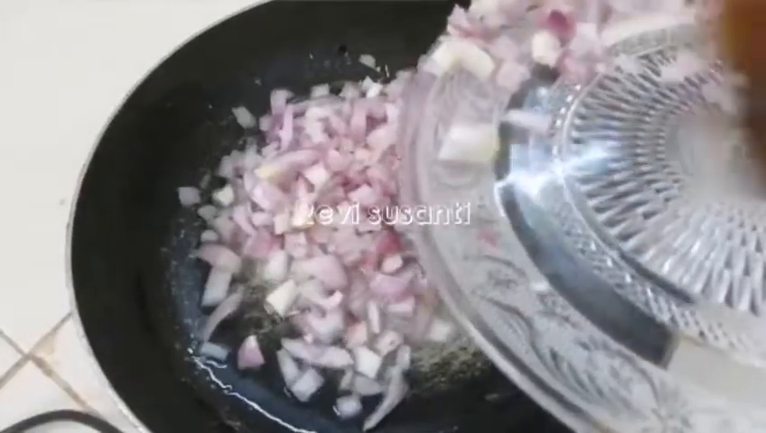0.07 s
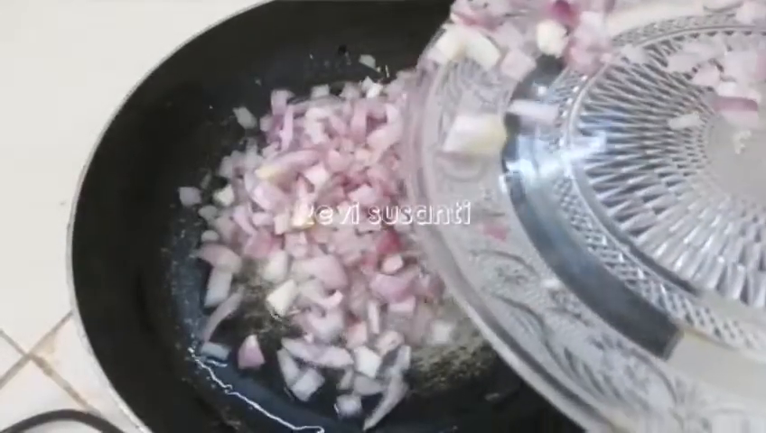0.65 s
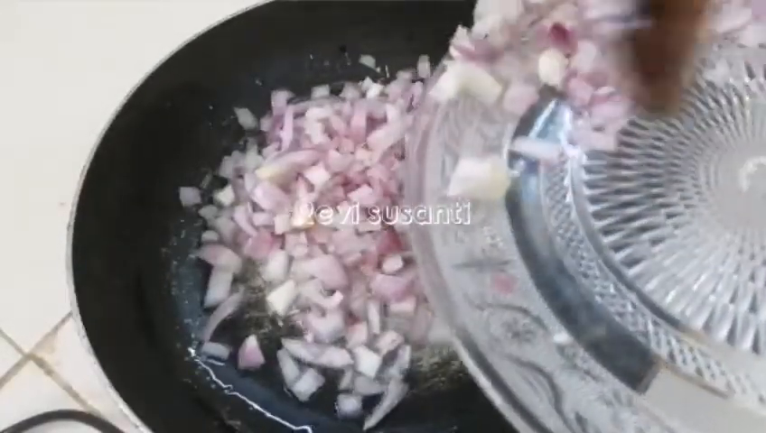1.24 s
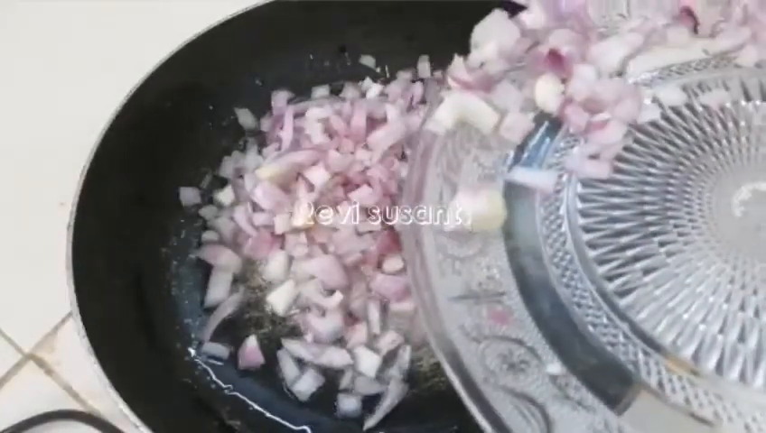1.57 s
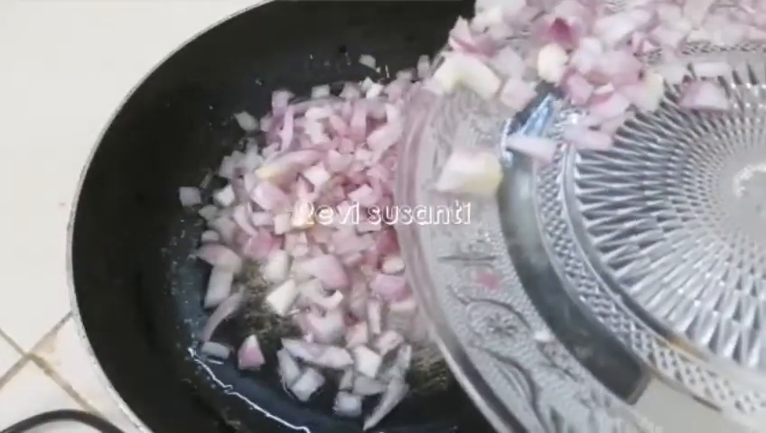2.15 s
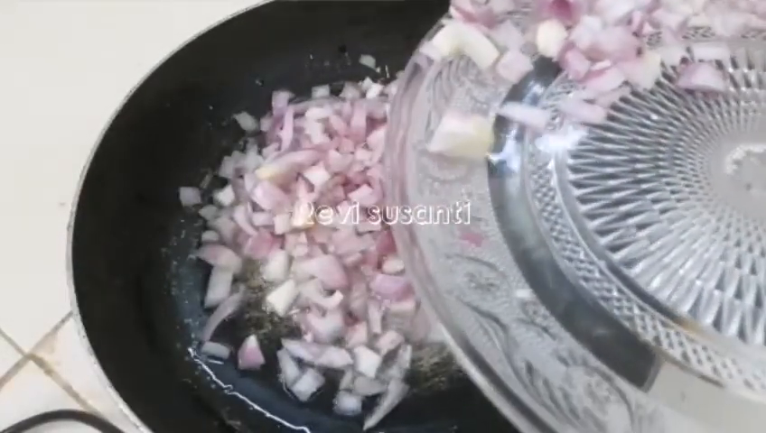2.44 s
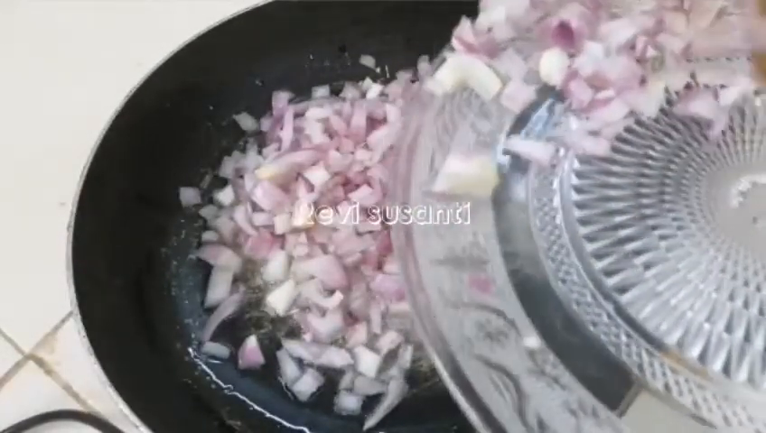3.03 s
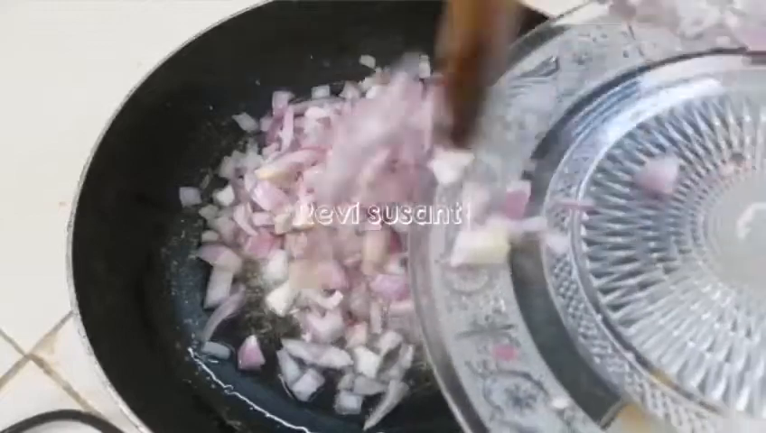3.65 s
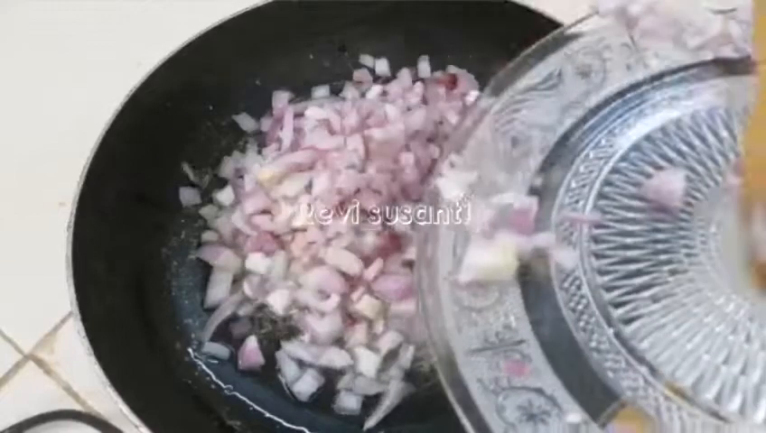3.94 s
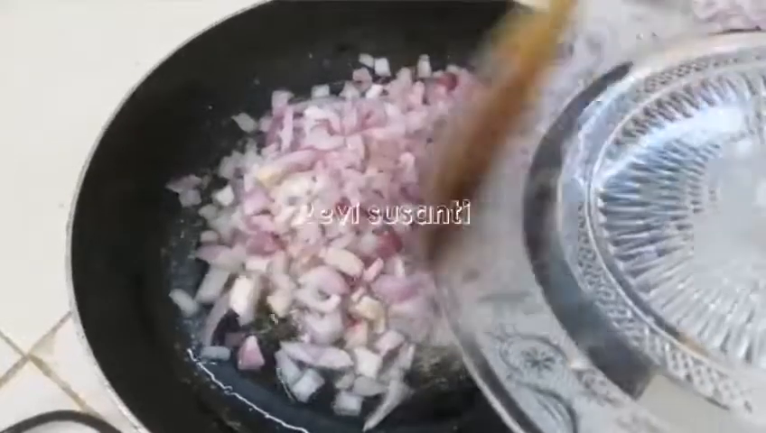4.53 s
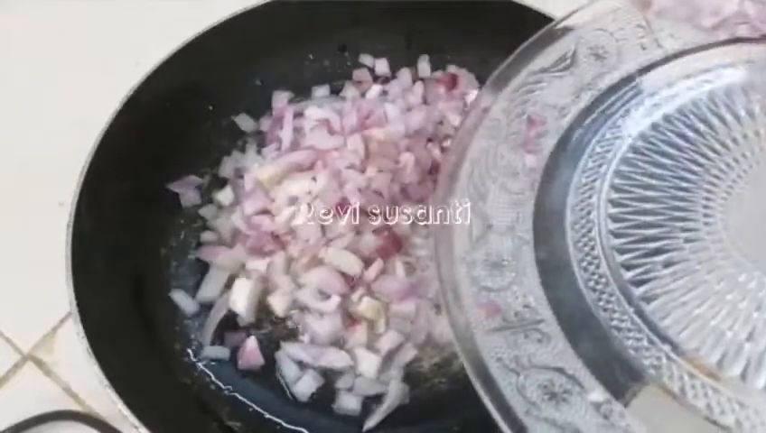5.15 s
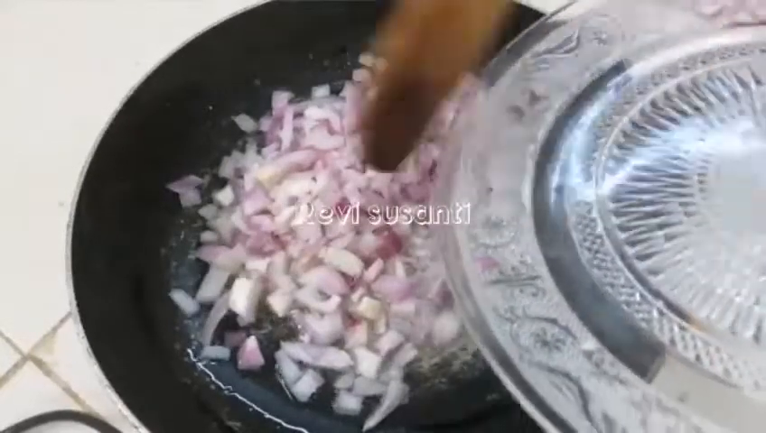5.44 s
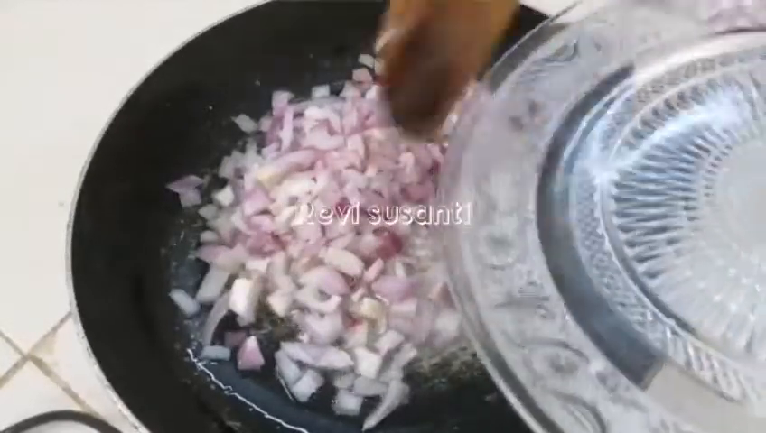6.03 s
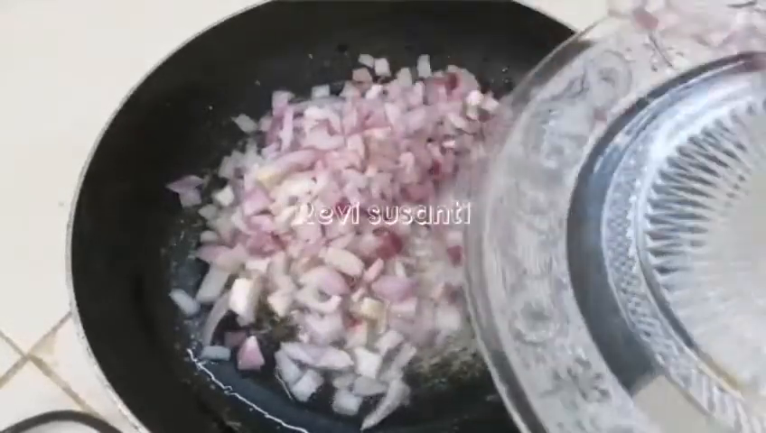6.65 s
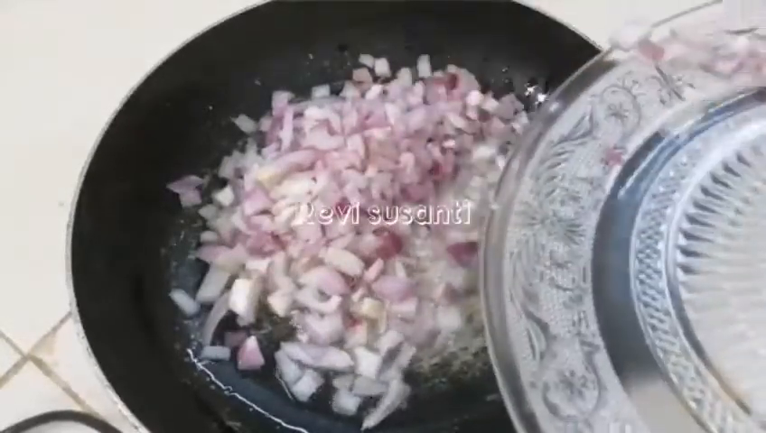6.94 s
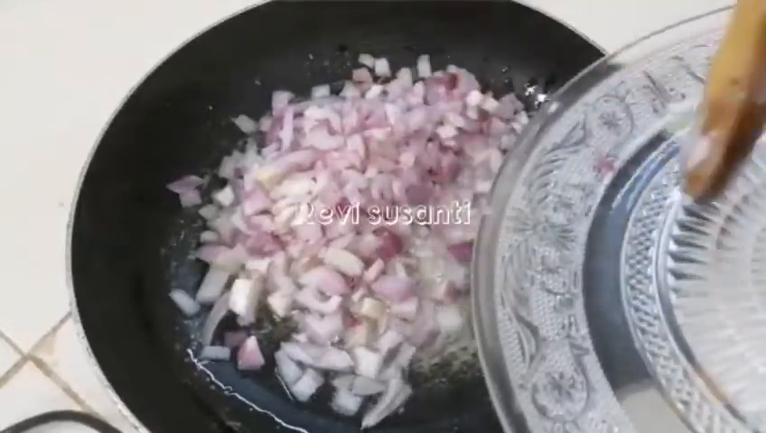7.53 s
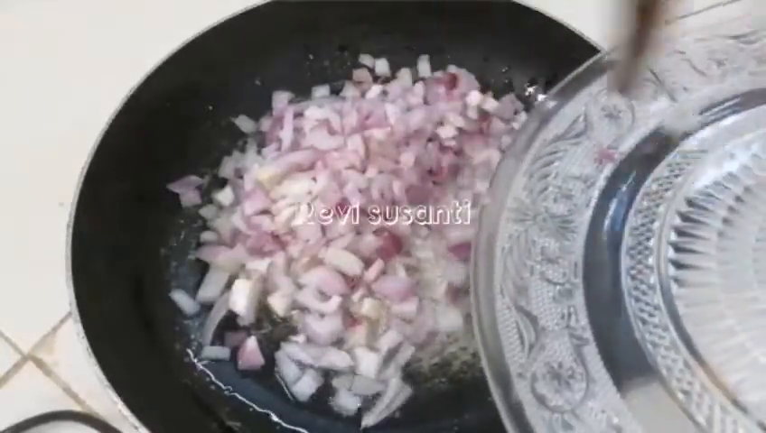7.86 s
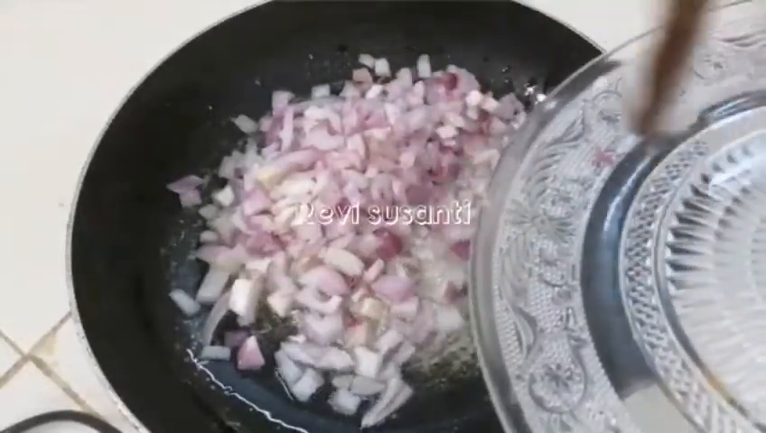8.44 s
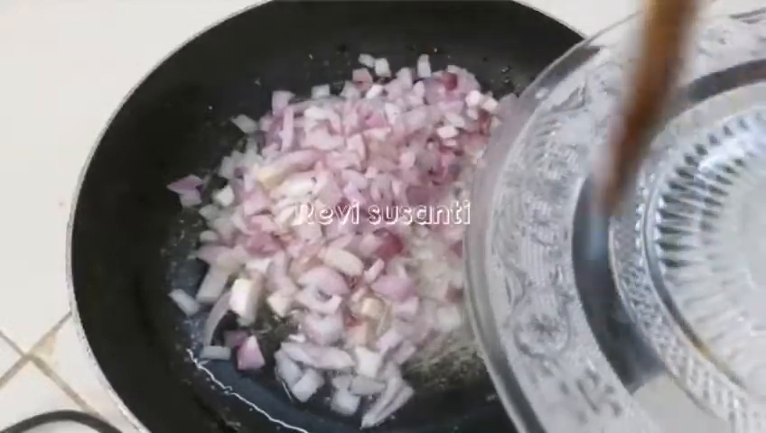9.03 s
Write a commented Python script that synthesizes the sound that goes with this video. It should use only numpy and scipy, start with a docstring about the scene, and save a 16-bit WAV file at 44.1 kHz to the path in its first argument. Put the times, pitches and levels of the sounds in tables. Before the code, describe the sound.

Diced onion sizzles steadily in a frying pan while a wooden spatula repeatedly knocks a glass plate, making it ring briefly.

```python
"""A kitchen, stereo microphone close to a frying pan. From the start, diced onion sizzles in a little oil
over the room's low hum: steam bubbles burst, droplets pop, wet pieces spit as they unstick.
From 2.4 s a wooden spatula knocks a pressed-glass plate again and again, and the glass rings; each loud
knock makes the recorder's gain control duck sizzle and hum for a moment. From 3.5 s the spatula pushes
more onion off the plate, and each fresh load makes the frying flare up and settle, left of centre."""
import sys
import numpy as np
from scipy import signal
from scipy.fft import rfft, irfft, next_fast_len
from scipy.io import wavfile
from scipy.ndimage import uniform_filter1d, minimum_filter1d

SR = 44100
rng = np.random.default_rng(int(sys.argv[2]) if len(sys.argv) > 2 else 0)


def dump(signal):
    """Clip the signal to [-1, 1] and save it as 16-bit WAV at the path in sys.argv[1]."""
    limited = np.clip(np.atleast_2d(signal).T, -1, 1)
    pcm = np.round(limited * 32767).astype(np.int16)
    wavfile.write(sys.argv[1], SR, pcm)


N = 409688
TIME = np.arange(N) / SR


def from_db(db):
    """Decibels to gain."""
    return 10 ** (np.asarray(db) / 20)


def unit_rms(x):
    """Scale to unit power."""
    return x / np.sqrt(np.mean(x ** 2) + 1e-20)


def in_time(rows):
    """Each column of a time curve, at every sample."""
    times, *columns = np.transpose(rows)
    return [np.interp(TIME, times, column) for column in columns]


def at_hz(points, hz):
    """Read a table on a log-frequency axis."""
    f, value = np.transpose(points)
    return np.interp(np.log(np.maximum(hz, 1)), np.log(f), value)


def panned(side_db):
    """Left and right gains of constant total power; positive is to the microphone's left."""
    gains = from_db(np.array([[.5], [-.5]]) * side_db)
    return gains / np.sqrt(np.mean(gains ** 2, axis=0))


def decay(t, t60):
    """Fall by 60 dB in t60 seconds."""
    return np.exp(-np.log(1000) * t / max(t60, 1e-3))


def add(out, s, sound):
    """Mix a sound in at s seconds."""
    i = max(0, round(s * SR))
    out[:, i:i + sound.shape[-1]] += sound[..., :N - i]


def drift(rate_hz):
    """A smooth random wander of rms 1."""
    pole = np.exp(-40 * np.pi * rate_hz / SR)
    slow = signal.lfilter([1], [1, -2 * pole, pole * pole], rng.standard_normal(N // 20 + 4002))[4000:]
    return np.interp(np.arange(N) / 20, np.arange(len(slow)), unit_rms(slow))


def coloured(x, spectrum, size=1024):
    """Unit-energy minimum-phase filter from (frequency [Hz], level [dB]), falling off past the ends."""
    hz = np.maximum(np.arange(size // 2 + 1) * SR / size, 10)
    octaves_outside = np.abs(np.log2(hz / np.clip(hz, spectrum[0][0], spectrum[-1][0])))
    cepstrum = irfft(np.log(from_db(at_hz(spectrum, hz) - 5.0 * octaves_outside)))
    cepstrum[size // 2:] = 0
    impulse = irfft(np.exp(rfft(2 * cepstrum)))
    return signal.oaconvolve(x, impulse[None] / np.linalg.norm(impulse), axes=1)[:, :N]


def crackle(per_s, spread_db):
    """Tiny bursts at random moments, many small and a few large; rms 1."""
    born = rng.random((2, N)) < per_s / SR
    size = from_db(spread_db * np.minimum(rng.exponential(1, N), 4.5))
    return unit_rms(born * size * rng.standard_normal((2, N)))


# The hum's two tones: (lower [Hz], upper [Hz])
HUM_PITCHES = (57.6, 85.0)
# The hum's level as heard: slow swells, and sudden dips where the recorder's gain control ducks after
# loud knocks: (time [s], lower tone level [dB], upper tone level [dB])
HUM_LEVELS = [(0.0, -64, -66), (0.44, -54, -64), (1.16, -64, -65.5), (2.43, -54.5, -65), (4.09, -65, -61.5),
              (4.34, -53, -60.5), (4.42, -64, -63), (4.84, -50.5, -55.5), (5.54, -62, -62),
              (6.16, -51, -56.5), (6.21, -57, -74), (6.49, -67, -61), (7.501, -63, -56.5), (7.58, -66, -87),
              (7.89, -51, -58.5), (8.251, -59, -64), (8.51, -51, -53), (8.61, -56, -67), (8.8, -53, -57.5),
              (9.29, -50, -59.5)]


def hum(gain_db=3.5, waver_db=2.0, wander_rad=0.33, overtone_db=-71, overtone_waver_db=5.5):
    """Room tone: a low hum with two wavering overtones; its table holds the gain control's dips."""
    levels = [db + gain_db + waver_db * drift(13.0) for db in in_time(HUM_LEVELS)]
    levels += [overtone_db + overtone_waver_db * drift(5.3) for _ in range(2)]
    tones = 0
    for hz, db in zip((*HUM_PITCHES, 114, 174), levels):
        phase = 2 * np.pi * hz * TIME + wander_rad * hz / HUM_PITCHES[0] * drift(4.3)
        tones = tones + from_db(db) * np.sin(phase + np.array([[-.28], [.28]]))
    return tones * panned(1.0)


# The room's air: (frequency [Hz], level [dB])
AIR_SPECTRUM = [(82, -33), (140, -6.5), (178, -5.5), (425, -9.5), (610, -7), (1070, -11.5), (2500, -19),
                (3250, -45), (5500, -120)]
# How alike it is on both sides of the microphone: (frequency [Hz], coherence [0-1])
AIR_COHERENCE = [(60, .9), (130, 0.97), (290, 0.52), (640, 0.58), (1400, 0), (15000, 0)]


def air(level_db=-61):
    """A soft rush all round the microphone, gently following the level of the hum's upper tone."""
    size = next_fast_len(N, True)
    alike = at_hz(AIR_COHERENCE, np.arange(size // 2 + 1) * SR / size)
    mid, side = rfft(rng.standard_normal((2, size)))
    rush = irfft(np.sqrt(1 + alike) * mid + np.sqrt(1 - alike) * side * [[1], [-1]], size)[:, :N]
    follow_db = 0.22 * (in_time(HUM_LEVELS)[1] - np.mean(np.array(HUM_LEVELS)[:, 2]))
    return from_db(level_db + follow_db) * unit_rms(coloured(rush, AIR_SPECTRUM))


# Loads of onion landing in the pan: (time [s], level [dB], settling time [s])
ONION_LOADS = [(-.2, -47, 0.79), (3.58, -49, 1.1), (5.0, -49.5, 1.1), (7.2, -48.5, 0.34),
               (8.78, -49.5, 2.5)]
# Where the microphone hears the frying: (time [s], left-right [dB])
FRYING_SIDE = [(0, 2), (3.8, 2.5), (4.1, 7.5), (5.5, 4), (7.3, 4.5), (7.8, 9), (9.28, 12)]


def frying_power(settled_db=-51, rise_s=0.052):
    """Wet onion meets hot oil: the power of the frying, left and right, flares up and settles."""
    power = from_db(settled_db) ** 2
    for s, db, settle_s in ONION_LOADS:
        age = np.maximum(TIME - s, 0)
        power = power + from_db(db) ** 2 * (1 - np.exp(-age / rise_s)) * np.exp(-age / settle_s)
    return power * panned(in_time(FRYING_SIDE)[0]) ** 2


# Steam escaping from under a piece: (time [s], level [dB], left-right [dB], half-width [s])
STEAM_SPURTS = [(0.065, -44.5, 2, 0.026), (0.227, -46, 4, 0.004), (0.283, -43, 0, .007),
                (0.707, -43.5, 4, 0.0054), (0.81, -41.5, 2, 0.0036), (0.85, -55, 4, .007),
                (1.302, -45.5, 5, .007), (1.621, -52, 1, 0.0078), (2.048, -45, 3, 0.0052),
                (4.322, -42, 9, 0.039), (4.834, -48.5, 17, 0.0056), (5.715, -42, 13, 0.0041),
                (6.394, -41, 6, 0.0084), (9.155, -45.5, 14, 0.0074)]
# The sizzle at close range: (frequency [Hz], level [dB])
SIZZLE_SPECTRUM = [(710, -59), (1200, -12.5), (1350, -30), (1500, -12.5), (1860, -14), (3320, -9),
                   (3900, -14.5), (5260, -3), (5850, -5.5), (7020, -0.5), (8330, -5), (9080, -10.5),
                   (14700, -16.5), (15500, -24.5)]


def sizzle(per_s=9000, flutter_db=0.87, patchy_db=2.5, hiss_db=-1.8, spit_db=-6.5, drying_db_per_s=0.04):
    """Steam bubbles burst round the onion; each patch of the pan sputters at its own pace and pitch."""
    power = frying_power()
    for s, db, side_db, half_s in STEAM_SPURTS:
        swell = np.hanning(2 * round(2 * half_s * SR))
        add(power, s - 2 * half_s, (from_db(db) * panned(side_db)) ** 2 * swell)
    edges_hz = [500, 2700, 5000, 7000, 10000, 18000]
    bubbles = [crackle(per_s, spread_db=0) for _ in range(2)]
    drying_db = drying_db_per_s * (TIME - TIME.mean())   # 7-10 kHz grows as the onion dries
    hiss = 0
    for k, band in enumerate(zip(edges_hz, edges_hz[1:])):
        patch = signal.sosfilt(signal.butter(2, band, "band", fs=SR, output="sos"), bubbles[k % 2])
        hiss = hiss + patch * from_db(patchy_db * drift(22.0) + (k == 3) * drying_db)
    hiss = unit_rms(coloured(hiss, SIZZLE_SPECTRUM)) * from_db(flutter_db * drift(5.7))
    return (from_db(hiss_db) * hiss + from_db(spit_db) * vent_spits()) * np.sqrt(power)


def vent_spits(per_s=130, spread_db=1.5, low_hz=3000, high_hz=10500, dry_low_hz=6000, t60=0.024):
    """Single vents in the onion give brief, hissy squeaks, each at its own pitch; rms 1."""
    out, t = np.zeros((2, N)), np.arange(SR // 40) / SR
    envelope = decay(t, t60) - decay(t, t60 / 6)
    for progress, pitch, size, side, phase in rng.random((int(per_s * N / SR), 5)):
        lowest_hz = low_hz + (dry_low_hz - low_hz) * progress ** 2   # vents narrow as the onion dries
        hz = lowest_hz + pitch * (high_hz - lowest_hz)
        squeak = np.sin(2 * np.pi * hz * t + np.array([[0], [2 * np.pi * phase]]))
        size_db = -spread_db * np.log(max(size, .02))
        add(out, progress * N / SR, from_db(size_db) * panned(24 * (side - .5)) * squeak * envelope)
    roughness = uniform_filter1d(rng.standard_normal(N), size=40)
    return unit_rms(coloured(out * roughness, SIZZLE_SPECTRUM))


def oil_spray(per_s=30, spread_db=5.0, gain_db=-17):
    """Fine oil spray crackles in lone sharp ticks, as strongly as the pan fries."""
    ticks = coloured(crackle(per_s, spread_db), [(1500, -1.0), (7000, -24), (15000, 7.0)])
    return from_db(gain_db) * np.sqrt(frying_power()) * ticks


def blows(rows, rattle, t60, lag_s):
    """A sharp push with a short dense rattle; the push reaches the microphone's left side later."""
    out, t = np.zeros((2, N)), np.arange(SR // 8) / SR
    for s, db in rows:
        noise = rng.standard_normal(len(t)) + 1.22 * rng.standard_normal((2, len(t)))
        burst = rattle * noise * decay(t, t60)
        burst[[0, 1], [round(lag_s * SR), 0]] += 20   # the push
        add(out, s, from_db(db) * burst)
    return out


# Soft bumps of onion and spatula: (time [s], level [dB])
ONION_BUMPS = [(.011, -51), (.311, -53.5), (.686, -58), (3.451, -50), (3.588, -40.5), (4.285, -49),
               (6.585, -44)]


def onion_bumps(gain_db=-4):
    """Onion being shoved gives dull bumps."""
    bumps = blows(ONION_BUMPS, rattle=1.05, t60=0.082, lag_s=.0001)
    spectrum = [(200, -21.0), (500, 6.5), (1000, 7.5), (1800, -4.5), (4000, -13.0)]
    return from_db(gain_db) * coloured(bumps, spectrum)


# Droplets bursting in the oil: (time [s], level [dB], left-right [dB])
DROPLETS = [(0.124, -42, 14), (0.445, -34.5, 7), (0.487, -38.5, -1), (0.563, -36.5, 2), (0.988, -38.5, 0),
            (1.176, -40, 18), (1.211, -40, -1), (1.377, -42.5, 2), (1.613, -39.5, -1), (2.309, -43, -2),
            (3.688, -44, 3), (4.34, -37, 13), (6.54, -36.5, 29), (6.743, -33.5, 19), (9, -39.5, 21)]


def droplet_pops(t60=0.013, gain_db=2.5, ring_db=-5):
    """A droplet bursts with a snap and a very short ring of its own pitch."""
    out, t = np.zeros((2, N)), np.arange(SR // 40) / SR
    for s, db, side_db in DROPLETS:
        ring = from_db(ring_db) * np.sin(2 * np.pi * rng.uniform(4200, 8620) * t)
        snap = rng.standard_normal((2, len(t)))
        add(out, s - .0005, from_db(db + gain_db) * panned(side_db) * (snap + ring) * decay(t, t60))
    return coloured(out, [(1200, -2), (3000, -0.5), (7000, 13.5), (10000, 1.5), (15000, -12)])


# Wet pieces unsticking: (time [s], level [dB], pitch [Hz])
WET_SMACKS = [(.252, -44.5, 1900), (0.534, -41.5, 2100), (0.685, -42, 1500)]


def wet_smacks(t60=0.044):
    """Each wet piece lets go with a short, octave-wide spit in the middle register."""
    out, t = np.zeros((2, N)), np.arange(SR // 20) / SR
    for s, db, hz in WET_SMACKS:
        b, a = signal.butter(1, [hz / np.sqrt(2), hz * np.sqrt(2)], "band", fs=SR)
        spit = unit_rms(signal.lfilter(b, a, rng.standard_normal((2, len(t)))))
        add(out, s, from_db(db) * spit * decay(t, t60))
    return out


def contact_db(hz, hardness_hz, db_per_octave=19.5):
    """A soft contact hardly wakes the modes above its hardness."""
    return -10 * np.log10(1 + from_db(db_per_octave * np.log2(hz / hardness_hz)) ** 2)


# Modes of the plate's rim and of its belly:
# (frequency [Hz], level [dB], share of ring time [ratio], left-right [dB], left lead [rad])
RIM_MODES = [(1233, 10, 1, 7, -1.07), (2092, 1.5, 0.64, 7.6, 2.5), (3434, -7, 0.16, 9, -2),
             (5145, -1, 0.15, 1.6, -1.78), (7125, 3, 0.29, 1.9, 1.72)]
BELLY_MODES = [(737, -3, 1.6, 19, -1.3), (862, 4, 0.21, 3.5, 0.8), (1014, 10, 0.079, 3, -0.5),
               (1697, 1.5, 1.1, 7.5, -2), (2642, 3.5, 0.68, -4.5, 2), (3630, -5, 0.81, -19, -3),
               (4780, -6, 0.94, 3, -2), (5910, -3.5, 0.6, -14, 3.5)]
# Each rim mode's part of a tap's node loss; the third swings widest there: (share [ratio])
NODE_LOSS_SHARES = (0.96, 0.078, -0.17, 0.041, 0.077)
# Spatula on plate: (time [s], strength [dB], hardness [Hz], loss near the lowest rim mode's node [dB],
# belly share [dB], wood share [dB], rim overtones left-right [dB], ring t60 [s])
SPATULA_TAPS = [(2.429, -12, 4100, 46, -14, -16.5, -4.5, 0.038),
                (2.4892, -34, 4500, 69, -35, -14, -22, 0.24), (2.824, -28.5, 990, 6, -38, -7.5, 1, 0.058),
                (2.958, -42.5, 1200, 7, -33, -31, 0, 0.22), (3.5076, -25.5, 2450, 32, -33, -21, -23, 0.21),
                (3.5587, -15.5, 1850, 14.5, -15.5, -46, -24, 0.11),
                (3.9167, -8, 5370, 4, -28, -63, -8, 0.092), (4.1059, -36, 7200, -1, -2.5, -8, -10, 0.12),
                (4.156, -44.5, 1180, -5.5, -6, -32, -4, 0.18),
                (4.3794, -5.5, 4800, 18, -35, -22.5, 1.5, 0.12),
                (4.5242, -17, 1740, 11.5, -14, -29, -5, 0.2), (4.56, -27.5, 1100, -1.5, -6, -22, -5, 0.048),
                (5.1236, -15.5, 2740, -1, -31, -21, -9.5, 0.089),
                (5.273, -26, 2020, 14, -37, -23, -19, 0.087), (5.345, -43.5, 8000, 2, -26, -14, -10, 0.31),
                (5.389, -19, 4670, 1.5, -4, -18, -22, 0.17), (5.4412, -28, 5500, -0.5, -7, -21, -10, 0.11),
                (5.5177, -22, 10000, 7, -8.5, -23, -3, 0.069), (5.7699, -8, 6730, 43, -23, -25, -2.5, 0.16),
                (5.9444, -23, 3830, 3, -5, -21.5, -14, 0.18), (6.197, -8, 5500, 22, -27, -21, -11, 0.15),
                (6.873, -7.5, 4640, 18.5, -40, -29, -4.5, 0.22),
                (7.544, -8.5, 6400, 20.5, -35, -28.5, -7, 0.19),
                (7.6238, -13.5, 2150, 9, -15, -29, -7, 0.2), (8.0731, -16, 5000, 15, -30, -21.5, -5, 0.22),
                (8.1908, -21.5, 7500, 2, -10, -35, -3.5, 0.25),
                (8.5665, -7, 4100, 28.5, -33, -31.5, -2.5, 0.14), (9.257, -49.5, 1200, 4, -25, -4, 6, 0.43)]


def glass_plate(touch_db=-6, touch_t60=0.049, main_db=-4, late_db=-24, late_t60=0.21,
                twin_db=-10, twin_split=0.01, detune=0.00083):
    """Each tap rings the glass; where it lands decides which modes speak; hand and spatula damp them."""
    out, t = np.zeros((2, N)), np.arange(SR // 3) / SR
    attack = np.minimum(t / 0.00047, 1)
    touch = from_db(touch_db) * decay(t, touch_t60)   # lost quickly while the wood still touches
    for k, (hz, db, share, mode_side_db, lead) in enumerate(RIM_MODES + BELLY_MODES):
        late = from_db(late_db) * decay(t, late_t60 * share)   # lingers out of reach of the hand
        for s, strength_db, hardness_hz, node_db, belly_db, _, side_db, t60 in SPATULA_TAPS:
            envelope = attack * (touch + late + from_db(main_db) * decay(t, t60 * share))
            gripped_hz = hz * (1 + detune * rng.standard_normal())   # the grip shifts each pitch
            phase = 2 * np.pi * gripped_hz * t
            swing = (-1) ** k * np.sin(phase + np.array([[lead / 2], [-lead / 2]]))
            if k < len(RIM_MODES):   # a round plate's rim modes come in close pairs that beat
                twin_phase = phase * (1 + twin_split * rng.normal()) + rng.uniform(0, 2 * np.pi, (2, 1))
                swing = swing + from_db(twin_db) * np.sin(twin_phase)
                wake_db = contact_db(hz, hardness_hz) - node_db * NODE_LOSS_SHARES[k]
            else:   # the belly, rattled by the flat of the blade, depends less on hardness
                wake_db = 0.34 * contact_db(hz, hardness_hz) + belly_db
            sides = panned(mode_side_db + (side_db if 0 < k < len(RIM_MODES) else 0))
            add(out, s, from_db(strength_db + wake_db + db) * sides * envelope * swing)
    return out


# The spatula's wood at close range: (frequency [Hz], level [dB])
WOOD_SPECTRUM = [(130, -12.5), (280, -2), (600, 2), (850, 9), (1200, 6.5), (1700, -5.5), (3000, -19),
                 (4200, -25), (7000, -24), (15000, -36)]


def wood_knocks(gain_db=6.0):
    """The spatula gives its own dry knock as it meets the glass."""
    knocks = [(s, db + wood_db) for s, db, _, _, _, wood_db, _, _ in SPATULA_TAPS]
    dry_blows = blows(knocks, rattle=1.16, t60=0.026, lag_s=0.00036)
    return from_db(gain_db) * coloured(dry_blows, WOOD_SPECTRUM)


def blade_chatter(gain_db=-4):
    """The wooden blade chatters on the plate's belly, a little left of centre."""
    out, t = np.zeros((2, N)), np.arange(SR // 5) / SR
    for s, db, _, _, belly_db, *_, t60 in SPATULA_TAPS:
        add(out, s, from_db(db + belly_db) * panned(3.8) * rng.standard_normal(len(t)) * decay(t, t60))
    spectrum = [(560, -19.0), (740, -2.5), (1150, -1.0), (1450, -12.5), (2800, -12.5), (4000, -34)]
    return from_db(gain_db) * coloured(out, spectrum)


def contact_cracks(gain_db=-5, t60=0.038, wake_hz=7000):
    """A hard contact, the kind that wakes the highest rim mode, begins with a bright crack."""
    out, t = np.zeros((2, N)), np.arange(SR // 40) / SR
    for s, db, hardness_hz, *_ in SPATULA_TAPS:
        level_db = db + contact_db(wake_hz, hardness_hz) + gain_db
        add(out, s, from_db(level_db) * rng.standard_normal((2, len(t))) * decay(t, t60))
    return coloured(out, [(2500, 10), (8000, -4), (15000, -22.0)])


# The spatula pushing onion across the plate: (time [s], length [s], level [dB])
PUSHES = [(3.53, 0.41, -56.5), (4.157, 0.36, -57.5), (4.59, 0.68, -60), (5.897, 0.43, -61),
          (9.05, 0.56, -58)]


def onion_slides(per_s=900, spread_db=4.0, width=0.41):
    """Wet pieces rub and tumble over the glass in a dull rustle that swells and fades with each push."""
    mid, side = crackle(per_s, spread_db)
    grains = mid + width * side * [[1], [-1]]
    rustle = unit_rms(coloured(grains, [(170, 8.5), (450, -3.0), (900, -6.0), (2000, -19)]))
    swell = 0
    for s, length_s, db in PUSHES:
        progress = np.clip((TIME - s) / length_s, 0, 1)
        swell = swell + from_db(db) * np.sqrt(np.abs(np.sin(np.pi * progress)))
    return rustle * swell


def kitchen_reflections(x, t60=0.37, wall_cut_hz=3500):
    """Dense reflections from the tiles reach the microphone later and duller than the direct sound."""
    t = np.arange(SR // 2) / SR
    build_up = np.clip((t - .005) / 0.0062, 0, 1)
    tail = rng.standard_normal((2, len(t))) * decay(t, t60) * build_up
    walls = signal.butter(1, wall_cut_hz, fs=SR, output="sos")
    tail = signal.sosfilt(walls, tail / np.linalg.norm(tail[0]))
    return signal.oaconvolve(x, tail, axes=1)[:, :N]


def scene():
    """Pan and plate close to the microphone, the kitchen around them."""
    hits = glass_plate() + wood_knocks() + onion_bumps() + blade_chatter() + contact_cracks()
    hits = hits + droplet_pops() + oil_spray() + wet_smacks()
    room = from_db(-13.5) * kitchen_reflections(hits)
    return hits + room + sizzle() + onion_slides() + hum() + air()


def record(dry, threshold_db=-21, slope=0.38, release_db_per_s=40, cutoff_hz=15700):
    """The recorder's gain control drops just ahead of a loud peak and creeps back; the top is cut."""
    peak_db = 20 * np.log10(np.abs(dry).max(axis=0) + 1e-6)
    wanted_cut_db = slope * np.maximum(peak_db - threshold_db, 0)
    release_db = release_db_per_s * TIME
    held_db = np.maximum.accumulate(wanted_cut_db + release_db) - release_db
    gain_db = uniform_filter1d(minimum_filter1d(-held_db, size=64), size=64)   # look ahead and smooth
    lowpass = signal.ellip(10, .05, 60, cutoff_hz, fs=SR, output="sos")
    return signal.sosfiltfilt(lowpass, dry * from_db(gain_db))


dry = scene()
out = record(dry)
dump(out)
```